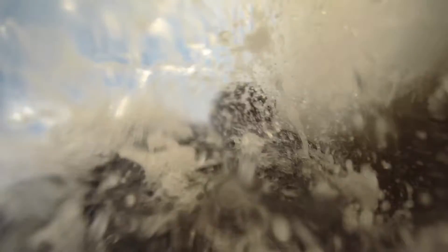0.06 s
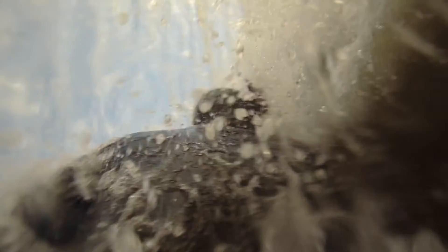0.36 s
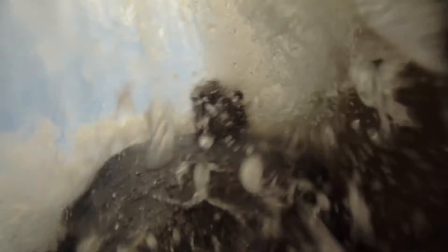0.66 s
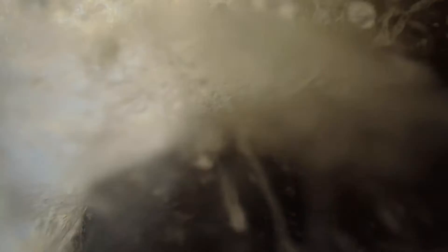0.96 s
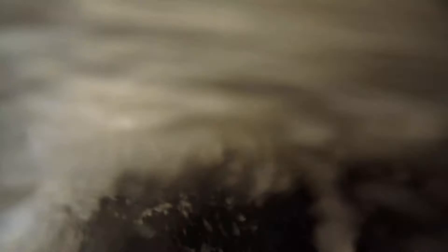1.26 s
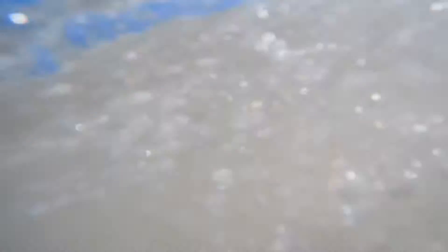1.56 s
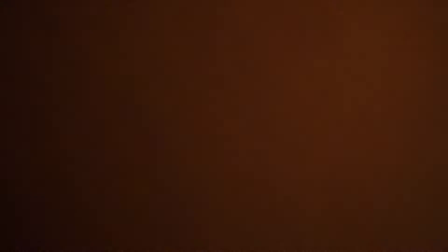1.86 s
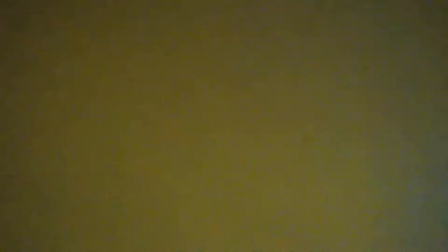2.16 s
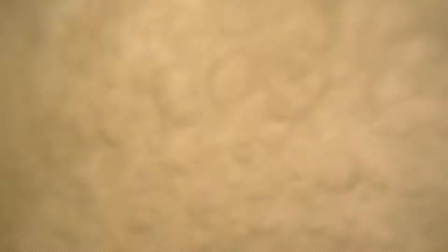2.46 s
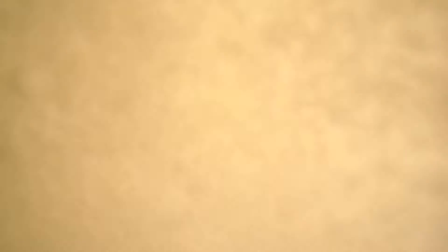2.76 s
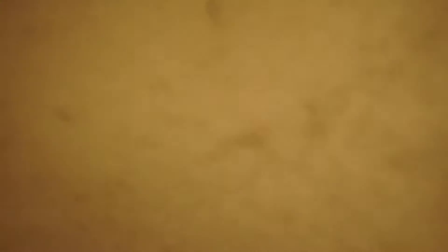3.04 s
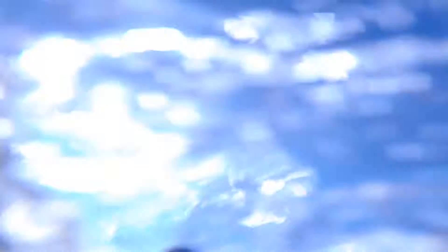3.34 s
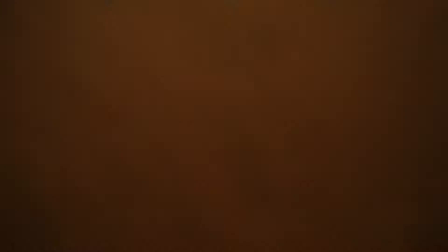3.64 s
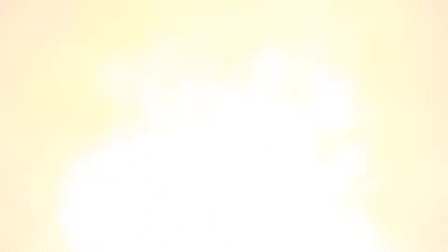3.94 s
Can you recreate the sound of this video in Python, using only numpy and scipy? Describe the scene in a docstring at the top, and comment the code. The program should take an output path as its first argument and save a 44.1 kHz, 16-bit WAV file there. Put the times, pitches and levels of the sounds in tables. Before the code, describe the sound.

Surf churns over an underwater microphone, muffled gurgling opening into bright, foamy splashes.

```python
"""Surf breaks over a small waterproof camera. At first the water is deep and muffled, as in slow motion:
rumble, gurgles, slaps on the case and a few large ringing bubbles. At about 1.4 s it opens into bright
surges of foam that churn against the housing, full of fizz and spray. In the lull from about 2.5 s,
single drops tick on the case over the distant wash. From about 3.3 s two more surges hit."""
import sys
import numpy as np
from scipy import signal
from scipy.io import wavfile
from scipy.ndimage import uniform_filter1d, minimum_filter1d

SR = 44100
rng = np.random.default_rng(int(sys.argv[2]) if len(sys.argv) > 2 else 0)


def dump(signal):
    """Clip the signal to [-1, 1] and save it as 16-bit WAV at the path in sys.argv[1]."""
    limited = np.clip(np.atleast_2d(signal).T, -1, 1)
    pcm = np.round(limited * 32767).astype(np.int16)
    wavfile.write(sys.argv[1], SR, pcm)


N = 176400
T = np.arange(N) / SR
OPENS_S, OPENING_S = 1.375, 0.004  # when the muffle lifts, and how fast
CUTOFF_HZ = 16000

# The pushes of foam that make up the surges. Each row: start in seconds, length in seconds,
# body level in dB, spray level in dB, sag over its length in dB (negative swells).
SURGE_PUSHES = [(1.358, 0.016, -66, -68, -8), (1.379, 0.032, -44, -43, 6.5),
                (1.416, 0.098, -45.5, -52.5, -8), (1.513, 0.064, -47, -52, 5),
                (1.558, 0.046, -45, -48.5, -1), (1.611, 0.14, -50.5, -52.5, 11.5),
                (1.732, 0.016, -52.5, -48.5, 2), (1.754, 0.078, -42, -45, 4),
                (1.845, 0.075, -50.5, -56.5, -0.5), (1.921, 0.072, -49, -47, -2),
                (1.995, 0.056, -47.5, -51.5, 11), (2.06, 0.093, -63.5, -78.5, -4),
                (2.155, 0.042, -50.5, -50.5, -1), (2.202, 0.15, -58, -55.5, -1.5),
                (2.344, 0.041, -57.5, -66.5, 5), (2.39, 0.13, -68.5, -79, 1.5),
                (3.259, 0.059, -56.5, -59, -2.5), (3.318, 0.021, -47, -49, -3.5),
                (3.349, 0.016, -51, -56, 0.5), (3.366, 0.028, -43, -46, 4),
                (3.409, 0.008, -54.5, -47.5, 1.5), (3.427, 0.037, -49, -54, 3.5),
                (3.54, 0.04, -72.5, -68, -8), (3.571, 0.046, -42, -48.5, -6),
                (3.616, 0.087, -46, -53.5, 1.5), (3.704, 0.2, -50.5, -61.5, 3.5),
                (3.883, 0.11, -49, -49.5, -2)]
# The weight of the surges. Each row: time in seconds, bass against the body level in dB.
SURGE_WEIGHT = [(1.38, -5.5), (1.43, -0.5), (1.5, -9.5), (1.69, -8.5), (1.77, -4.5), (1.87, -2),
                (1.97, -6.5), (3.44, -4), (3.59, -8), (3.75, 0.5)]
# Water seals the microphone for an instant. Each row: centre in seconds, length in seconds, dip in dB.
MIC_SEALS = [(1.413, 0.0039, 29), (3.615, 0.0028, 65), (3.628, 0.0044, 54), (3.638, 0.0045, 30)]
# Faders of the muffled water. Each row: time in seconds, gurgle level in dB, rumble level in dB.
MUFFLED_LEVELS = [(0.0, -57.5, -52.5), (0.526, -61.5, -56.5), (1.36, -55.5, -53.5)]
# Muffled slaps on the case. Each row: start in seconds, length in seconds, level in dB,
# centre pitch in Hz, pan to the left in dB.
WATER_SLAPS = [(0.289, 0.049, -55.5, 486, 3), (0.448, 0.0092, -51, 1420, 8), (0.616, 0.022, -47, 1110, 6),
               (0.722, 0.029, -57.5, 1740, 14), (0.676, 0.0025, -61, 1680, -1.5),
               (0.909, 0.028, -52.5, 677, 4), (0.964, 0.0055, -51.5, 710, 2), (1, 0.015, -50.5, 690, 4),
               (1.126, 0.029, -44.5, 1296, 4), (1.13, 0.078, -48.5, 280, 0), (1.156, 0.037, -41, 880, 2.5)]
# Large single bubbles. Each row: start in seconds, starting pitch in Hz, level in dB,
# cycles of that pitch to fade by 60 dB.
LARGE_BUBBLES = [(0.631, 585, -28, 13), (0.651, 626, -38, 31), (0.686, 686, -30, 23.4),
                 (.686, 2120, -44, 45), (0.73, 1740, -36, 45), (0.983, 1830, -43.5, 40),
                 (1.127, 3220, -55.5, 130), (1.163, 793, -26.5, 36), (1.621, 2400, -32.5, 44),
                 (1.675, 1320, -37.5, 24), (1.689, 2345, -38.5, 120), (1.709, 2680, -31.5, 33),
                 (2.285, 161, -36.5, 6.7), (2.595, 707, -46.5, 21), (2.687, 534, -55, 40),
                 (2.689, 298, -61, 57), (2.867, 310, -61, 59), (3.245, 3050, -41.5, 81),
                 (3.393, 3920, -17, 29), (3.386, 1120, -25.5, 30), (3.443, 820, -39, 16),
                 (3.578, 2740, -26, 28), (3.593, 3330, -33, 89)]
# Drops on the case. Each row: start in seconds, level in dB, centre pitch in Hz.
CASE_DROPS = [(1.759, -47, 1500), (2.065, -42.5, 3500), (2.244, -32, 10300), (2.382, -38.5, 2530),
              (2.485, -45.5, 1660), (2.514, -46.5, 1630), (2.522, -49.5, 1180), (2.55, -49, 3370),
              (2.641, -45, 1540), (2.952, -37, 2250), (2.9591, -42.5, 1740), (3.045, -52, 3600),
              (3.14, -58, 10000), (3.2261, -34.5, 5200), (3.245, -37, 3100), (3.406, -33, 1200),
              (3.434, -44, 1490), (3.4448, -38, 4800), (3.473, -44, 4260), (3.5046, -40, 4700)]
# Fader of the distant wash. Each row: time in seconds, level in dB.
WASH_LEVELS = [(2.5, -72), (2.70, -70), (2.85, -75.5), (3.04, -73), (3.12, -78.5), (3.22, -73)]
# Tone curves of the four noise beds. Each row: frequency in Hz, relative noise density in dB.
FOAM_TONE = [(70, -29), (120, -8), (500, -1.5), (800, -5.5), (1600, -2.5), (2300, 1.5), (3300, -4.5),
             (8000, -3), (15000, -5)]
RUMBLE_TONE = [(32, -2.5), (95, -8), (200, -8.5)]
GURGLE_TONE = [(250, -4), (400, -5.5), (800, -2.5), (1200, -13), (1900, -12), (3000, -34.5)]
WASH_TONE = [(25, -15), (60, -49), (200, -1.5), (450, 1.5), (1200, -6), (2300, -13.5), (3400, -21),
             (15000, -27.5)]
# Stereo image while muffled and once open. Each row: frequency in Hz, left-right likeness
# (1 is mono, 0 is wide).
MUFFLED_IMAGE = [(160, 1), (550, 0.046), (1600, 0.034)]
OPEN_IMAGE = [(4400, 1), (8000, 0.087)]


def foam():
    """Surges churn on the case: low buffeting, a fizzing body, crackling spray and snapping droplets."""
    body_gain, spray_gain = surge_gains()
    bass_gain = body_gain * from_db(in_time(SURGE_WEIGHT)[0])
    spatter = drift(126)  # one fast flutter shared by body and hiss
    buffet = rush(FOAM_TONE, OPEN_IMAGE, (75, 700), flicker_db=2, flicker_rate=33, bands=6)
    body = rush(FOAM_TONE, OPEN_IMAGE, (700, 5000), flicker_db=4, flicker_rate=57, bands=8)
    body *= unit_rms(from_db(1.68 * spatter))
    hiss = rush(FOAM_TONE, OPEN_IMAGE, (5000, 17000), flicker_db=3, flicker_rate=60, bands=6)
    hiss *= unit_rms(from_db(4 * spatter))
    fizz = swarm(per_s=900, span_hz=(750, 5000), cycles=24, spread_db=4, width_db=1, pitches=27)
    spray = swarm(per_s=810, span_hz=(4800, 14700), cycles=6.1, spread_db=2.5, width_db=3.5, pitches=13)
    snaps = swarm(per_s=60, span_hz=(2500, 11000), cycles=5, spread_db=2, width_db=2, pitches=8)
    mids = body_gain * (from_db(-1.5) * body + from_db(-5.5) * fizz.mean(axis=0))
    highs = spray_gain * (from_db(2) * hiss + from_db(-4) * spray)
    snap_gain = spray_gain ** 0.76 * from_db(-13)  # snaps swing less than the spray
    return bass_gain * buffet + mids + highs + snap_gain * snaps


def surge_gains():
    """Envelopes of body and spray: each push of foam hits, sags or swells, and drains away."""
    power = 0
    for start, length, body_db, spray_db, sag_db in SURGE_PUSHES:
        age = T - start
        shape = envelope(age, length, attack_s=0.0077, release_s=0.01)
        sag = from_db(-sag_db * np.clip(age / length, 0, 1))
        power += (from_db([[body_db], [spray_db]]) * shape * sag) ** 2
    return np.sqrt(power)


def muffled_water():
    """Deep rumble, gurgles and slaps with the treble shut off, gone once the sound opens."""
    gurgle_db, rumble_db = in_time(MUFFLED_LEVELS)
    rumble = rush(RUMBLE_TONE, MUFFLED_IMAGE, (18, 250), flicker_db=3, flicker_rate=8.3, bands=6)
    flow = rush(GURGLE_TONE, MUFFLED_IMAGE, (250, 3300), flicker_db=4.5, flicker_rate=29, bands=8)
    gurgles = swarm(per_s=170, span_hz=(203, 1900), cycles=18, spread_db=0.5, width_db=11.5, pitches=21)
    water = from_db(rumble_db) * rumble + from_db(gurgle_db) * (flow + from_db(-5.5) * gurgles) + slaps()
    muffle = signal.ellip(8, .5, 70, 3050, fs=SR, output="sos")
    fade_out = np.clip((OPENS_S - T) / OPENING_S + 1, 0, 1)
    return signal.sosfilt(muffle, water) * fade_out


def slaps():
    """Sheets of water hit the case: short, fluttering noise bursts around one pitch each."""
    out = np.zeros((2, N))
    half_band = 2 ** 0.57  # 0.57 octaves either side
    for start, length, db, hz, pan_db in WATER_SLAPS:
        noise = unit_rms(band_pass(rng.standard_normal((3, N)), hz / half_band, hz * half_band))
        stereo = noise[:2] + 0.5 * noise[2]
        shape = envelope(T - start, length, attack_s=0.0017, release_s=0.009)
        out += stereo * shape * from_db(db) * from_db([[pan_db / 2], [-pan_db / 2]])
    return out * unit_rms(from_db(2 * drift(130)))


def bubbles():
    """Large air pockets ring and rise in pitch as they die away."""
    out = np.zeros(N)
    rise, attack_share = 0.18, 0.015  # pitch rises 18 % over a 60 dB fade
    for start, hz, db, cycles in LARGE_BUBBLES:
        turns = np.maximum(T - start, 0) * hz
        life = np.minimum(turns / cycles, 2)
        tone = np.sin(2 * np.pi * turns * (1 + rise * life / 2))
        attack = 1 - np.exp(-(turns / (1 + attack_share * cycles)) ** 2)
        out += tone * from_db(db - 60 * life) * attack * (life < 2)
    return out


def drops():
    """Each drop bursts on the case in a brief splat with a wet tail, coloured by a pitch of its own."""
    out = np.zeros((2, N + SR))
    splat_s, tail_s, splat_octaves, top_octaves = 0.0014, 0.0084, 3.9, 1.08
    age = T[:SR // 20]
    shape = np.exp(-age / splat_s) + from_db(-15) * np.exp(-age / tail_s)
    for start, db, hz in CASE_DROPS:
        burst = shape * (rng.standard_normal(len(age)) + 0.16 * rng.standard_normal((2, len(age))))
        edges = [hz / 2 ** splat_octaves, min(hz * 2 ** splat_octaves, CUTOFF_HZ)]
        splat = signal.lfilter(*signal.butter(1, edges, "band", fs=SR), burst)
        ping = signal.lfilter(*signal.iirpeak(hz, Q=3.4, fs=SR), burst)
        soften = signal.butter(2, min(hz * 2 ** top_octaves, CUTOFF_HZ), fs=SR)
        tick = signal.lfilter(*soften, ping + from_db(-4) * splat)
        at = int(start * SR)
        out[:, at:at + len(age)] += from_db(db) * tick / np.abs(tick).max()
    return out[:, :N]


def distant_wash():
    """The surrounding surf with faintly popping foam, heard once the sound has opened."""
    level_db, = in_time(WASH_LEVELS)
    wash = rush(WASH_TONE, OPEN_IMAGE, (25, 16000), flicker_db=2, flicker_rate=25, bands=16)
    plops = swarm(per_s=180, span_hz=(280, 830), cycles=15, spread_db=5, width_db=2.5, pitches=11)
    pops = swarm(per_s=400, span_hz=(1900, 2800), cycles=9, spread_db=3, width_db=3, pitches=7)
    fade_in = np.clip((T - OPENS_S) / OPENING_S, 0, 1)
    return from_db(level_db) * (wash + from_db(-7.5) * plops + from_db(-11.5) * pops) * fade_in


def rush(tone, image, span_hz, flicker_db, flicker_rate, bands):
    """Turbulent water: stereo noise in bands that each flicker on their own, at unit power."""
    out = 0
    edges = np.geomspace(*span_hz, bands + 1)
    white = rng.standard_normal((2, 2, N))
    for k, (low, high) in enumerate(zip(edges, edges[1:])):
        mid, side = band_pass(white[k % 2], low, high)  # neighbouring bands get different noise
        hz = np.sqrt(low * high)
        likeness = at_hz(image, hz)
        gain = from_db(at_hz(tone, hz) + flicker_db * drift(flicker_rate))
        out += gain * (np.sqrt(1 + likeness) * mid + np.sqrt(1 - likeness) * side * [[1], [-1]])
    return unit_rms(out)


def swarm(per_s, span_hz, cycles, spread_db, width_db, pitches):
    """Many small bubbles ping at random times, sizes, pitches and pans, at unit power."""
    birth_draw, size_draw, sign_draw = rng.random((N, 3)).T
    at = np.flatnonzero(birth_draw < per_s / SR)
    size = from_db(spread_db * np.minimum(-np.log(size_draw[at]), 3.5)) * np.sign(sign_draw[at] - .5)
    pitch_index = rng.integers(0, pitches, N)[at]
    pan_db = width_db * rng.standard_normal(N)[at]
    out = 0
    for k, hz in enumerate(np.geomspace(*span_hz, pitches)):
        clicks = np.zeros((2, N))
        clicks[:, at] = size * (pitch_index == k) * from_db([pan_db / 2, -pan_db / 2])
        # the slope of the ring snaps on sharply; the divisor keeps all pitches equally strong
        out += np.diff(ring(clicks, hz, cycles / hz), prepend=0) / np.sin(np.pi * hz / SR)
    return unit_rms(out)


def ring(clicks, hz, t60):
    """Each click sets a sine ringing that fades by 60 dB in t60 seconds."""
    decay, step = np.exp(-np.log(1000) / (t60 * SR)), 2 * np.pi * hz / SR
    return signal.lfilter([0, np.sin(step)], [1, -2 * decay * np.cos(step), decay ** 2], clicks + 1e-18)


def drift(rate):
    """A smooth random wobble of unit power, rolling off above rate in Hz."""
    hop, run_in = 8, 4000
    pole = np.exp(-2 * np.pi * hop * rate / SR)
    noise = rng.standard_normal(N // hop + run_in + 2)
    slow = signal.lfilter([1], [1, -2 * pole, pole ** 2], noise)[run_in:]
    return np.interp(np.arange(N) / hop, np.arange(len(slow)), unit_rms(slow))


def envelope(age, length, attack_s, release_s):
    """Ramp up, hold until length, then die away."""
    return np.clip(age / attack_s, 0, 1) * np.exp(-np.maximum(age - length, 0) / release_s)


def band_pass(x, low_hz, high_hz):
    """Keep one band, with gentle slopes."""
    return signal.sosfilt(signal.butter(2, [low_hz, high_hz], "band", fs=SR, output="sos"), x)


def in_time(rows):
    """Each fader of a table at every sample."""
    times, *columns = np.transpose(rows)
    return [np.interp(T, times, column) for column in columns]


def at_hz(curve, hz):
    """Read a curve on a log frequency axis."""
    frequencies, values = np.transpose(curve)
    return np.interp(np.log(hz), np.log(frequencies), values)


def from_db(db):
    """Decibels to gain."""
    return 10 ** (np.asarray(db) / 20)


def unit_rms(x):
    """Scale to unit power."""
    return x / np.sqrt(np.mean(x ** 2) + 1e-20)


def scene():
    """The mix; foam and drops lose their deep bass and duck when water seals the microphone."""
    duck_db = sum(depth * np.exp(-(2 * (T - centre) / length) ** 4) for centre, length, depth in MIC_SEALS)
    low_cut = signal.butter(3, 86, "high", fs=SR, output="sos")
    splashes = signal.sosfilt(low_cut, (foam() + drops()) * from_db(-duck_db))
    return muffled_water() + splashes + bubbles() + distant_wash()


def record(dry):
    """A fast limiter holds the peaks, then the very top is cut."""
    ceiling, window = 0.025, int(0.002 * SR)
    needed_gain = ceiling / np.maximum(np.abs(dry).max(axis=0), ceiling)
    gain = uniform_filter1d(minimum_filter1d(needed_gain, window), window)
    return signal.sosfilt(signal.ellip(10, .2, 80, CUTOFF_HZ, fs=SR, output="sos"), dry * gain)


dry = scene()
out = record(dry)
dump(out)
```